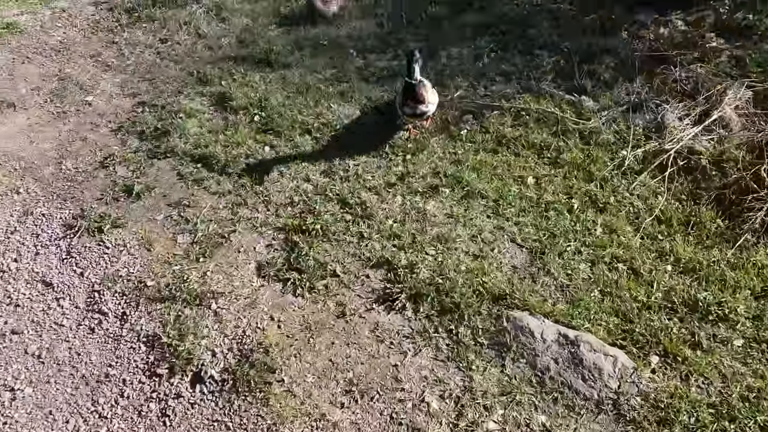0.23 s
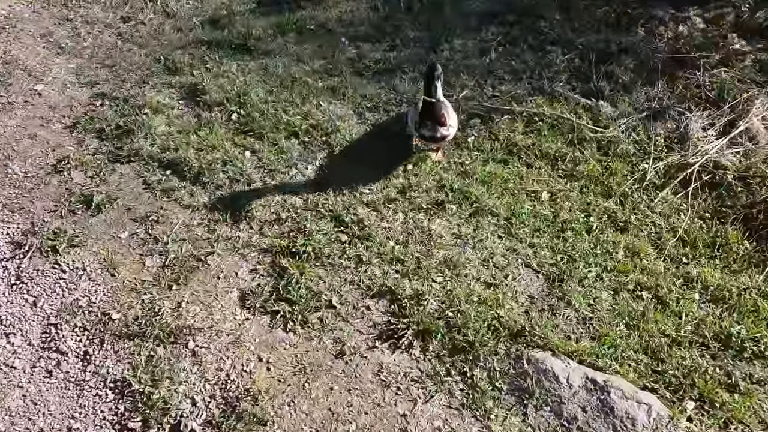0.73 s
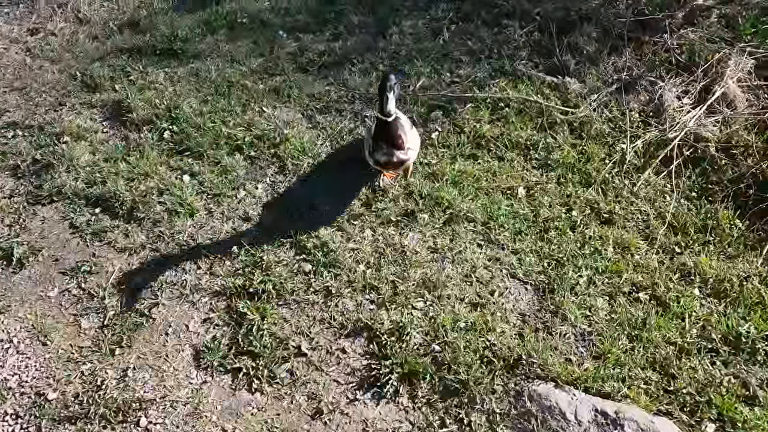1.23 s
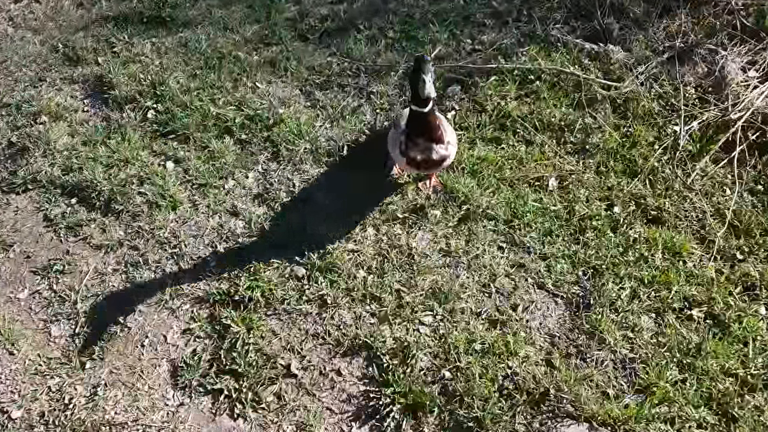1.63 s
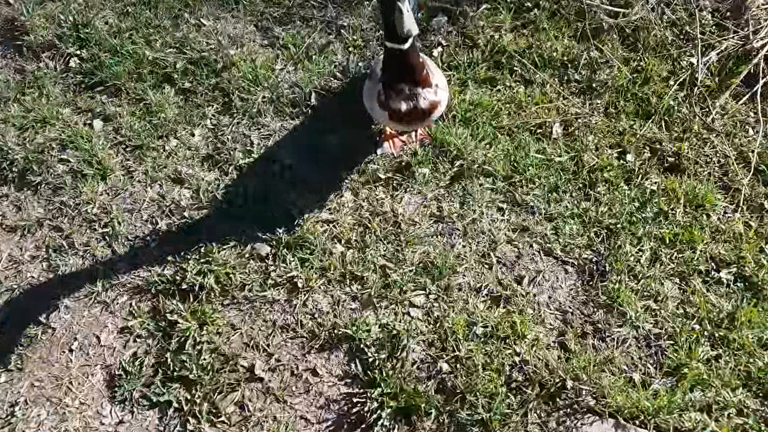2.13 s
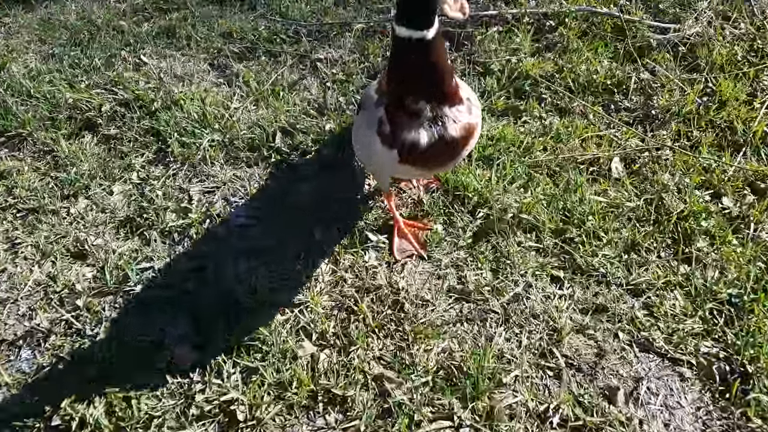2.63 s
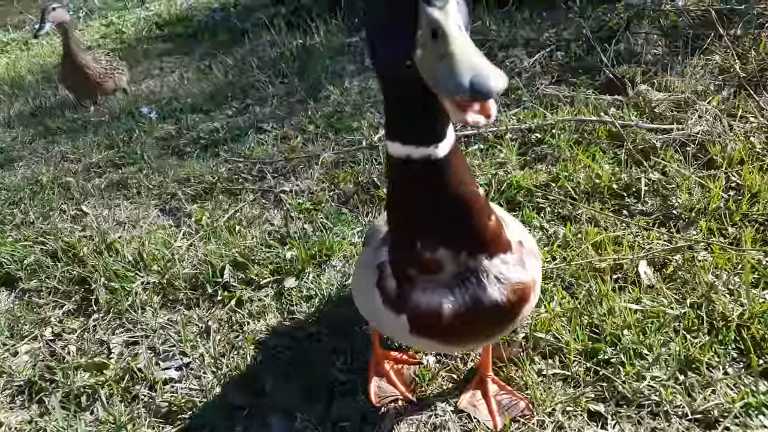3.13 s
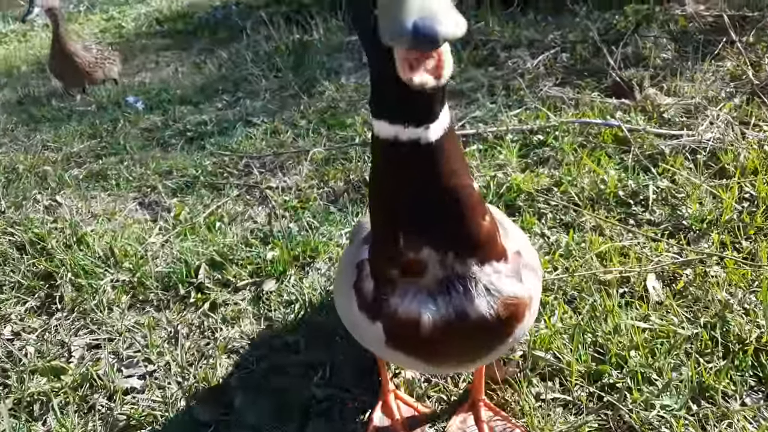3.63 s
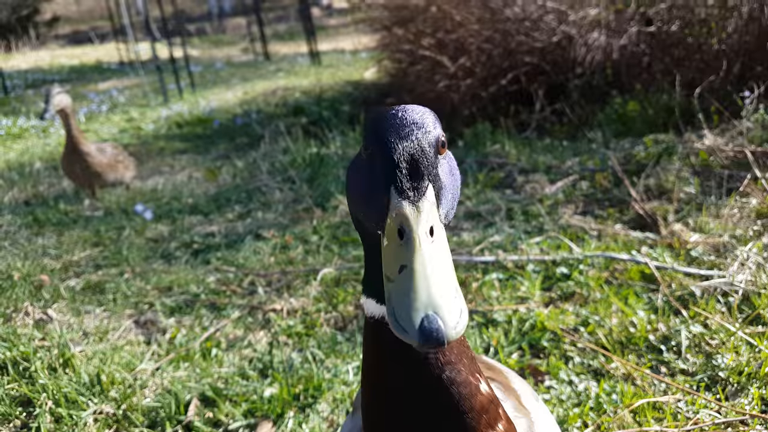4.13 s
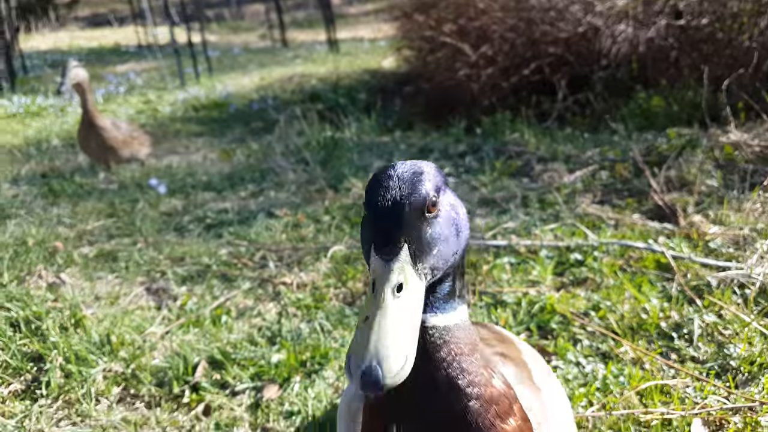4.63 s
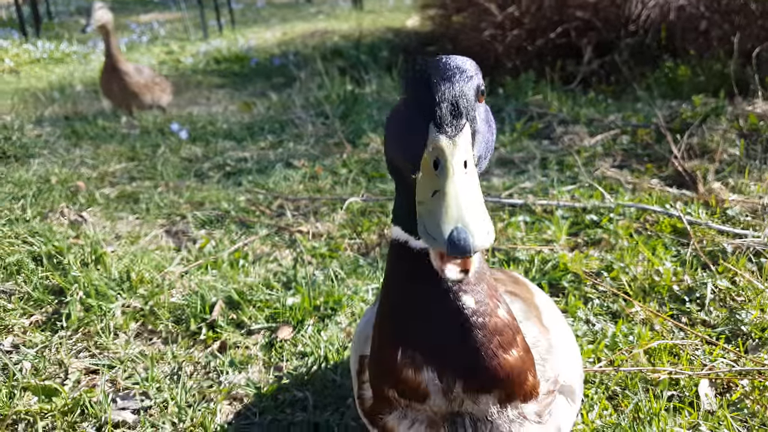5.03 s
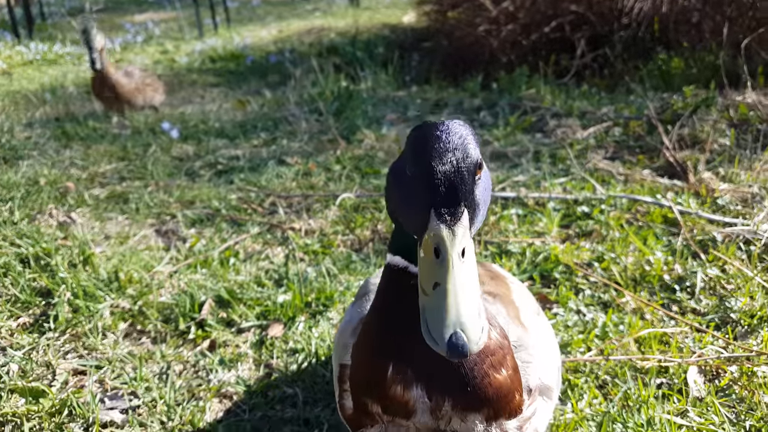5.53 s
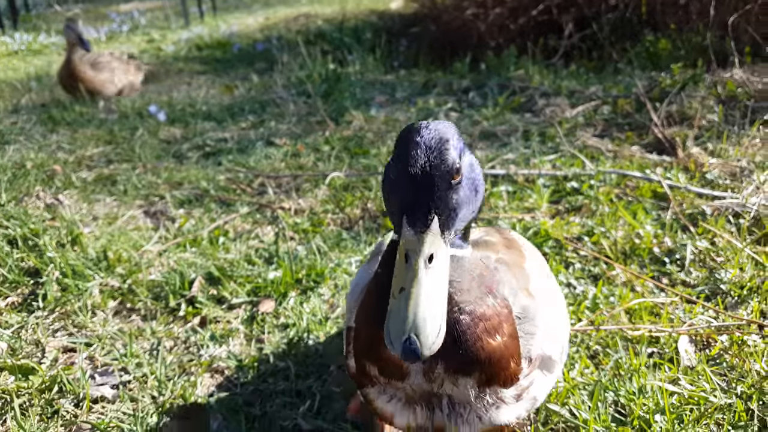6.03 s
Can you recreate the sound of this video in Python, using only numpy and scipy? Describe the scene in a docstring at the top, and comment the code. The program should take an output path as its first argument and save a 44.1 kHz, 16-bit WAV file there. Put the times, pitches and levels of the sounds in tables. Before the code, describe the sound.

Outdoors on grass, a small bird whistles faintly as a duck starts a string of brief, rasping quacks and bill clicks. It comes up to the microphone with soft footfalls and a dry rustle, growing louder, and clacks its bill once very sharply. Then it stands close by and quacks several more times with short pauses. Underneath are a steady airy rush and a barely audible distant engine gathering speed.

```python
"""A drake rasps short quacks as he walks up to a microphone over a lawn; clicks of the bill open many of them.
A quack is a train of about 65 strokes a second, each a rising chirp that rings throat and bill.
His feet pad on the turf and dry grass crackles. A small bird whistles thinly, and a far engine
gathers speed over the outdoor rush and a light breeze."""
import sys
import numpy as np
from scipy import signal
from scipy.fft import rfft, irfft
from scipy.io import wavfile
from scipy.ndimage import map_coordinates

SR = 44100
rng = np.random.default_rng(int(sys.argv[2]) if len(sys.argv) > 2 else 0)


def wrap_up_sound(samples):
    """Save the sound to the file named by the first command line argument, as 16-bit audio."""
    columns = np.atleast_2d(samples).T
    # keep every value between -1 and 1, then stretch to whole-number steps
    tamed = np.clip(columns, -1, 1)
    steps = np.round(tamed * 32767).astype(np.int16)
    wavfile.write(sys.argv[1], SR, steps)


N = 277389
TIME_S = np.arange(N) / SR
LAST_GAP_S = .0163  # stroke spacing once slowed, at 1800 Hz pitch

# quacks: start_s (first full stroke), length_s, level_db, fade_db, pitch_hz, throat_hz, gape (0-1)
QUACK_CALLS = [ (.148, 0.1, -26, 2.5, 1895, 1450, 0.77), (.495, 0.049, -23.5, 7, 1857, 1610, 0.43),
               (.583, .03, -25.5, -2, 1850, 1395, 0.25), (.917, 0.088, -23.5, 5, 1900, 1523, 0.72),
               (1.082, 0.025, -29, 2.5, 1750, 1484, 0), (1.393, 0.026, -23, 4, 1953, 1750, 0.55),
               (1.472, .044, -26.5, -2.5, 1800, 1300, .45), (1.923, .12, -23.5, 2.5, 1902, 1510, 0.57),
               (2.300, .028, -16.5, 7.5, 1826, 1550, .7), (2.407, 0.041, -23.5, -1.5, 1760, 1520, 0.37),
               (2.706, 0.039, -18, 4, 1980, 1620, 0.87), (2.817, .03, -17, 0.5, 1780, 1370, 0.54),
               (3.12, .044, -13, 8, 2052, 1474, 0.66), (3.213, 0.042, -17, 8.5, 1825, 1356, 0.38),
               (3.629, 0.11, -14.5, 6, 1786, 1390, 0.17), (4.254, 0.1, -17.5, 7, 1664, 1420, 0.36),
               (4.640, 0.097, -17, 6, 1690, 1596, 0.43), (5.154, .125, -15, 7, 1781, 1554, .5),
               (5.857, 0.14, -18, 11.5, 1673, 1595, 0.38)]


def undb(db):
    """Decibels to gain."""
    return 10 ** (np.asarray(db) / 20)


def unit(x):
    """Scale to rms 1."""
    return x / np.sqrt(np.mean(x ** 2))


def add(out, start_s, sound):
    """Mix a sound in at start_s."""
    i = max(int(start_s * SR), 0)
    out[..., i:i + sound.shape[-1]] += sound[..., :N - i]


def fall(t, t60_s):
    """Exponential decay."""
    return np.exp(-np.log(1000) * t / t60_s)


def ring(x, hz, width_hz):
    """One resonance, gain 1 at its centre."""
    hz = min(hz, .45 * SR)
    return signal.lfilter(*signal.iirpeak(hz, hz / width_hz, fs=SR), x)


def resonate(x, modes):
    """Parallel resonances: centre_hz, width_hz, gain_db."""
    return sum(undb(db) * ring(x, hz, width_hz) for hz, width_hz, db in modes)


def highpass(x, hz):
    """Second-order low cut."""
    return signal.sosfilt(signal.butter(2, hz, "high", fs=SR, output="sos"), x)


def noise(spectrum, size, correlation):
    """Stereo noise, rms 1. Spectrum: freq_hz, level_db. Left-right correlation: a function of Hz."""
    hz, db = np.transpose(spectrum)
    f = np.maximum(np.fft.rfftfreq(size, 1 / SR), 1)
    gain = undb(np.interp(np.log(f), np.log(hz), db)) * np.minimum(f / hz[0], 1)
    alike = np.clip(correlation(f), -1, 1) * np.ones_like(f)
    mid, side = rfft(rng.standard_normal((2, size))) * gain * np.sqrt([1 + alike, 1 - alike])
    return unit(irfft([mid + side, mid - side], size))


def wander(rate_hz, size):
    """Smooth random curve, spread near 1."""
    hop = max(int(SR / rate_hz), 2)
    knots = rng.standard_normal(size // hop + 4)
    return map_coordinates(knots, [1 + np.arange(size) / hop], order=2)


def outdoor_rush(start_db=-36, slope_db_per_s=-1.1062, wander_db=1.0):
    """Broad rush, slowly dying down, similar on both sides in the bass."""
    # rush spectrum: freq_hz, level_db
    spectrum = [(25, -12), (55, 0), (110, -5.5), (235, -5), (340, -6.5), (480, -2), (740, -4), (1000, -3.5),
                (1300, -6.5), (2340, -16), (4000, -24), (6300, -28.5), (12000, -31)]
    rush = noise(spectrum, N, lambda f: 0.59 / (1 + (f / 850) ** 4))
    return rush * undb(start_db + slope_db_per_s * TIME_S + wander_db * wander(5.6, N))


def breeze(level_db=-58, gust_db=4):
    """Light air buffets each microphone port almost independently."""
    buffet = noise([(25, -4), (60, -3), (200, -5), (600, -29), (3000, -62)], N, lambda f: .2)
    return undb(level_db + gust_db * wander(11, N)) * buffet


def engine(full_s=4.0, full_db=-47, swell_db_per_s=16, firing_hz=61.4, climb_hz_per_s=10):
    """Far engine: climbing firing tone, two overtones, low rumble. Swells until full_s, then holds."""
    since_s = TIME_S - full_s
    phase = 2 * np.pi * np.cumsum(firing_hz + climb_hz_per_s * since_s) / SR
    db = full_db + swell_db_per_s * np.minimum(since_s, 0)
    tone = np.sin(phase) + undb(-19) * np.sin(2 * phase) + undb(-14) * np.sin(3 * phase)
    rumble = noise([(60, -1), (120, -4), (230, 0.5), (400, -10), (1500, -42)], N, lambda f: .4)
    return undb(db + 1.5 * wander(6, N)) * (unit(tone) + undb(-3) * rumble)


def bird(waver_hz=110):
    """Thin whistles of a small bird, most falling slightly."""
    # whistles: start_s, length_s, from_hz, to_hz, level_db
    whistles = [(0, 0.039, 7150, 7200, -55), (0.068, 0.09, 7640, 6800, -50.5),
                (0.244, 0.14, 7350, 6870, -54.5)]
    out = np.zeros(N)
    for start_s, length_s, from_hz, to_hz, db in whistles:
        size = int(length_s * SR)
        pitch_hz = np.linspace(from_hz, to_hz, size) + waver_hz * wander(400, size)
        tone = np.sin(2 * np.pi * np.cumsum(pitch_hz) / SR)
        add(out, start_s, undb(db) * signal.windows.tukey(size) * tone)
    return out


def grass(walking_db=-49, standing_db=-53.5, stop_s=3.6, stopping_s=0.42, swish_rise_s=0.074,
          swish_t60_s=1, snap_gain_db=-6, snap_t60_s=0.009, faint_per_s=5):
    """Dry blades snap over a grainy rustle that swells with each swish and eases once the drake stops."""
    # feet swishing through the blades: peak_s, level_db
    swishes = [(.15, -47), (.93, -44), (1.42, -42), (2.22, -44), (2.68, -39), (2.95, -41), (3.22, -37),
               (3.42, -43), (6.1, -40.5)]
    # loudest snaps: start_s, relative_db, centre_hz
    snaps = [(.7648, -18, 10900), (.782, -21, 6000), (0.831, -20, 13000), (.891, -13.5, 13000),
             (1.031, -22, 11000), (1.2305, -20.5, 13000), (1.244, -20, 12900), (1.294, -8, 13000),
             (1.367, -18, 8700), (2.537, -24, 14000), (3.6385, -11, 11900), (4.506, -23, 6030),
             (5.3274, -22, 9000)]
    # rustle spectrum: freq_hz, level_db
    spectrum = [(2000, -9), (4000, -12.5), (7000, -17.5), (10000, -19.5), (15500, -14)]
    out, t = np.zeros((2, N)), np.arange(SR // 10) / SR
    grains = undb(3.0 * wander(900, N) + 2.7 * wander(50, N))
    rustle = unit(grains * noise(spectrum, N, lambda f: 0))
    power = undb(np.interp(TIME_S, [stop_s, stop_s + stopping_s], [walking_db, standing_db])) ** 2
    for peak_s, db in swishes:
        rise = np.clip(1 + (TIME_S - peak_s) / swish_rise_s, 0, 1)
        decay = fall(np.maximum(TIME_S - peak_s, 0), swish_t60_s)
        power += (undb(db) * rise * decay) ** 2
    faint_snaps = [(when * stop_s, -32.5 + 8 * size, 4000 + 8000 * colour)
                   for when, size, colour in rng.random((int(faint_per_s * stop_s), 3))]
    for start_s, db, hz in snaps + faint_snaps:
        burst = unit(ring(rng.standard_normal((2, len(t))), hz, hz * 0.8))
        add(out, start_s, undb(db + snap_gain_db) * burst * fall(t, snap_t60_s))
    return out + np.sqrt(power) * rustle


def bill_clicks(ring_hz=3100, soft_ring_hz=1850, ring_t60_s=0.0029, crack_t60_s=0.012,
                horn_db=-3, crack_db=-11, opening_s=.05, opening_pop_db=4, idle_pop_db=-8):
    """The bill parts or snaps shut: a crack, a brief ring of the horn, a pop of the mouth."""
    # bill clicks: start_s, level_db
    clicks = [(0.1311, -13.5), (.232, -16), (.4793, -15), (.897, -16.5), (1.368, -15), (1.581, -15.5),
              (1.904, -14.5), (2.115, -7), (2.269, -8), (2.552, -20), (2.6889, -5), (3.099, -1),
              (3.2057, 10.5), (3.6046, -11), (4.2254, -18.5), (4.611, -5), (4.824, -20), (5.1126, -10),
              (5.8264, -14)]
    # mouth cavity modes: freq_hz, t60_s, gain_db
    mouth_modes = [(593, 0.013, -2.5), (966, 0.013, -1)]
    out, t = np.zeros((2, N)), np.arange(SR // 30) / SR
    for start_s, db in clicks:
        coming_db = [level for quack_s, _, level, *_ in QUACK_CALLS if 0 < quack_s - start_s < opening_s]
        if coming_db:  # air held for a quack pops out, scaled to that quack
            hz, pop_db = ring_hz, coming_db[0] + opening_pop_db
        else:  # idle clack, duller when soft
            hz, pop_db = np.interp(db, [-16, -8], [soft_ring_hz, ring_hz]), db + idle_pop_db
        horn = np.sin(2 * np.pi * hz * t) * fall(t, ring_t60_s)
        crack = unit(ring(rng.standard_normal((2, len(t))), 2800, 2800)) * fall(t, crack_t60_s)
        crack += resonate(crack, [(5190, 120, -1.5), (8500, 450, 1.7)])
        pop = sum(undb(gain_db) * np.sin(2 * np.pi * mode_hz * t) * fall(t, t60_s)
                  for mode_hz, t60_s, gain_db in mouth_modes)
        click = undb(db + horn_db) * horn + undb(db + crack_db) * crack + undb(pop_db) * pop
        add(out, start_s, highpass(click, 520))
    return out


def syrinx(start_s, length_s, fade_db, pitch_hz, t, first_gap_s=.0135, slowing_strokes=1.296,
           edge_db_per_stroke=-11, sink=.17, flutter_db=2.9, scatter_db=0.9, jitter_s=0.00035):
    """Rising chirps in a train that slows, sinks and fades as air runs out. Returns tone and airflow."""
    # glide of one stroke: from_peak_ms, pitch_ratio, level_db
    stroke = [(-7.5, .6, -24.5), (-5, 0.664, -7), (-2.5, 0.864, -9), (0.25, 0.969, 0), (1.87, 1.185, -5),
              (2.5, 1.425, -12.5), (6.5, 1.127, -12)]
    glide_ms, glide_ratio, glide_db = np.transpose(stroke)
    number = np.arange(-2, 12)  # 0 is the first full stroke
    gaps_s = LAST_GAP_S + (first_gap_s - LAST_GAP_S) * np.exp(-np.maximum(number - 1, 0) / slowing_strokes)
    elapsed_s = np.cumsum(gaps_s) * (1800 / pitch_hz) ** 0.651  # tension raises pitch and rate together
    elapsed_s = elapsed_s - elapsed_s[number == 0]
    spent = np.clip(elapsed_s / length_s, 0, 1) ** 2.104
    strokes_outside = np.maximum(-number, 0) + np.maximum(elapsed_s - length_s, 0) / LAST_GAP_S
    levels_db = edge_db_per_stroke * strokes_outside - fade_db * spent
    pitches_hz = pitch_hz * (1 - sink * spent)
    flutter = undb(flutter_db * wander(900, len(t)))
    waver = 1 + 0.0982 * wander(1100, len(t))
    tone, flow = np.zeros((2, len(t)))
    for peak_s, db, centre_hz in zip(start_s + elapsed_s, levels_db, pitches_hz):
        late, speed, loud, sharp = rng.standard_normal(4)
        age_ms = (t - peak_s - jitter_s * late) * 1000 * np.exp(.15 * speed)
        shape_db = np.interp(age_ms, glide_ms, glide_db, left=-200, right=-200)
        swell = undb(shape_db + db + scatter_db * loud) * flutter
        sweep = np.interp(age_ms, glide_ms, glide_ratio) ** np.exp(.035 * db)  # weak strokes glide less
        hz = centre_hz * sweep * waver * (1 + 0.058 * sharp)
        tone += swell * np.sin(2 * np.pi * np.cumsum(hz) / SR)
        flow += swell
    return tone, flow


def quacks(grit_db=-12.5, direct_db=-10, buzz_db=-27, chest_db=-26,
           hiss_db=-26, hiss_db_per_gape=13, hiss_fade_db_per_s=38):
    """Gritty strokes ring windpipe, throat and bill; the hardest buzz; air hisses and rumbles with each."""
    # turbulence in the syrinx: freq_hz, level_db
    grit_spectrum = [(700, -12.5), (1400, 2.5), (2200, -0.5), (2900, -7), (3700, -25), (8000, -45)]
    # breath hiss: freq_hz, level_db
    hiss_spectrum = [(300, -1), (900, -7.5), (2400, -0.5), (3600, 0), (4800, -7), (6400, -7.5), (7600, -8),
                     (9500, -16), (16000, -28)]
    # upper bill resonances: centre_hz, width_hz, gain_db
    bill_modes = [(2930, 105, 5.5), (3900, 110, -2), (4600, 80, 4), (5236, 57, 6.5), (5990, 110, 7.5),
                  (6550, 120, 6.5)]
    # chest rumble: freq_hz, level_db
    chest_spectrum = [(200, -7), (550, 0.5), (900, -1), (2000, -26.5)]
    out = np.zeros((2, N))
    for start_s, length_s, db, fade_db, pitch_hz, throat_hz, gape in QUACK_CALLS:
        t = start_s - .04 + np.arange(SR // 4) / SR
        tone, flow = syrinx(start_s, length_s, fade_db, pitch_hz, t)
        source = tone + undb(grit_db) * flow * noise(grit_spectrum, len(t), lambda f: 1)[0]
        tract = [(1020, 120, 0),  # windpipe
                 (throat_hz, 120, 3.5),
                 (throat_hz * 1.344, 190, 0),  # bill
                 (throat_hz * (1.488 + 0.37 * gape), 190, -3)]  # bill tip
        voice = unit(highpass(undb(direct_db) * source + resonate(source, tract), 970))
        shift = 1 + 0.0353 * rng.standard_normal()  # the bill opens differently each time
        upper = [(hz * shift, width_hz, gain_db) for hz, width_hz, gain_db in bill_modes]
        buzz = undb(buzz_db) * unit(resonate(highpass(tone * np.abs(tone), 3600), upper))
        gate = flow ** .6
        breath = noise(hiss_spectrum, len(t), lambda f: 1 / (1 + (f / 7000) ** 2))
        air = gate * undb(-hiss_fade_db_per_s * (t - start_s)) * breath
        hiss = undb(hiss_db + hiss_db_per_gape * gape) * unit(air + resonate(air, upper))
        chest = undb(chest_db) * unit(gate * noise(chest_spectrum, len(t), lambda f: .9))
        duty = (length_s + LAST_GAP_S) / (t[-1] - t[0])  # level applies while the strokes last
        add(out, t[0], undb(db) * np.sqrt(duty) * (voice + buzz + hiss + chest))
    return out


def lawn_echo(x, near_db=-14, near_t60_s=0.07, far_db=-27, far_t60_s=0.11):
    """The ground scatters the sound at once; bushes return a faint tail."""
    t = np.arange(SR // 2) / SR
    near, far = ring(rng.standard_normal((2, 2, len(t))), 1260, 2800)
    ground = undb(near_db) * unit(near * fall(t, near_t60_s))
    bushes = undb(far_db) * unit(far * fall(t, far_t60_s))
    response = (ground + bushes) / np.sqrt(len(t)) / 2
    return x + signal.fftconvolve(x, response, axes=1)[:, :N]


def footsteps(t60_s=0.21):
    """Webbed feet land on turf with a soft, low pat."""
    # footfalls: start_s, level_db
    footfalls = [(.46, -35.5), (2.117, -35.5), (2.21, -37), (2.298, -36), (2.41, -32.5), (4.80, -36.5)]
    out, t = np.zeros((2, N)), np.arange(SR // 5) / SR
    for start_s, db in footfalls:
        pat = noise([(60, -17), (110, -3.5), (250, -8.5), (500, -17), (2000, -39)], len(t), lambda f: .7)
        add(out, start_s, undb(db) * pat * fall(t, t60_s))
    return out


def scene(left_bias_db=1.63):
    """The drake comes up slightly to the left, so his sound reaches that side first."""
    left, right = lawn_echo(quacks() + bill_clicks())
    lag_samples = np.interp(TIME_S, [2.5, 3.3], [0, 1.8])
    right = map_coordinates(right, [np.arange(N) - lag_samples], order=3)
    mix = np.array([left, right]) + footsteps() + grass() + outdoor_rush() + breeze() + engine() + bird()
    return mix * undb([[left_bias_db / 2], [-left_bias_db / 2]])


def record(dry):
    """Clip at full scale, low-pass at 16 kHz."""
    top_cut = signal.ellip(8, .2, 70, 16000, fs=SR, output="sos")
    return signal.sosfilt(top_cut, np.clip(dry, -1, 1))


dry = scene()
out = record(dry)
wrap_up_sound(out)
```